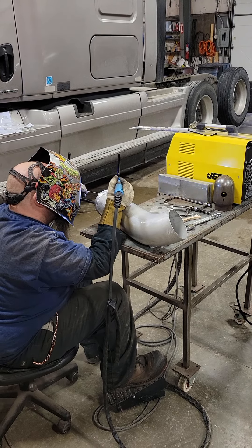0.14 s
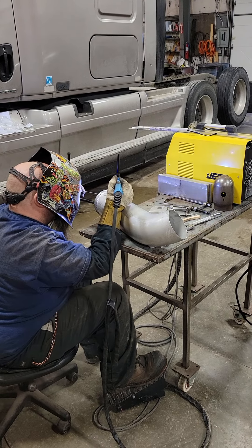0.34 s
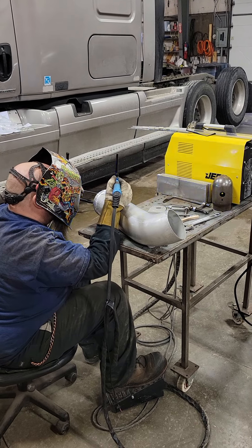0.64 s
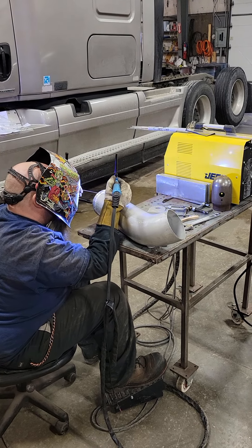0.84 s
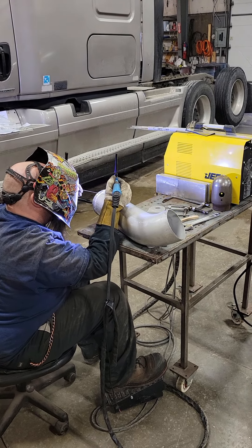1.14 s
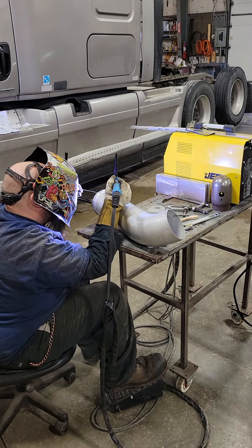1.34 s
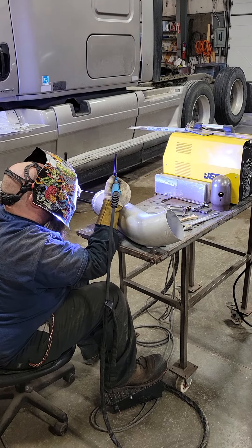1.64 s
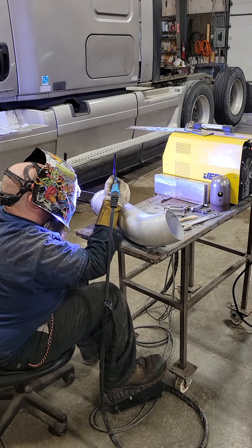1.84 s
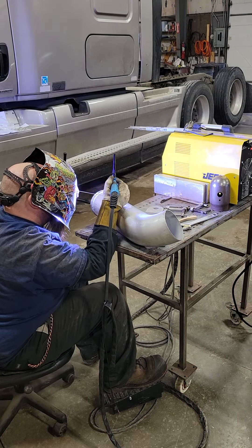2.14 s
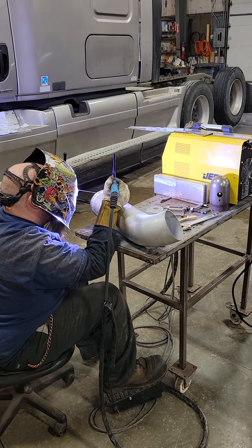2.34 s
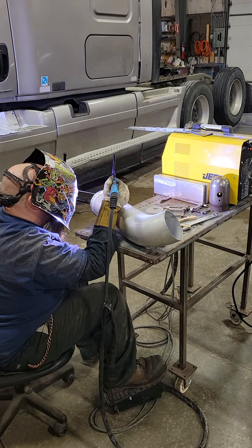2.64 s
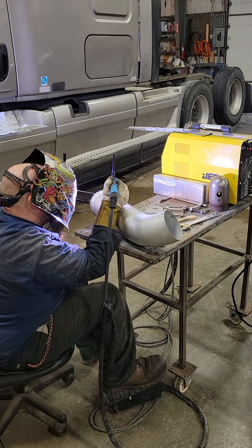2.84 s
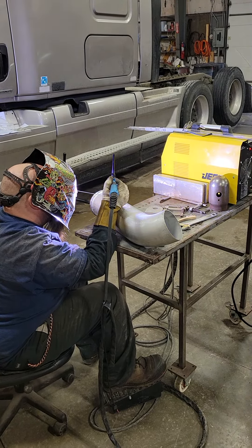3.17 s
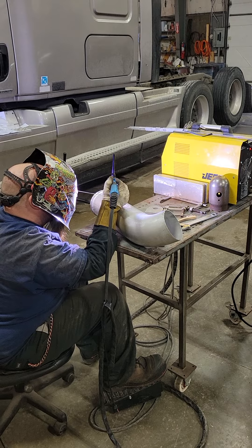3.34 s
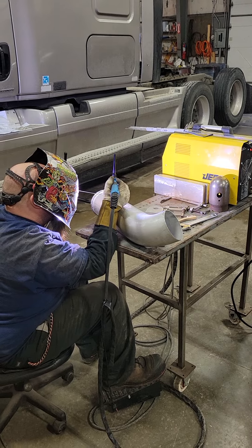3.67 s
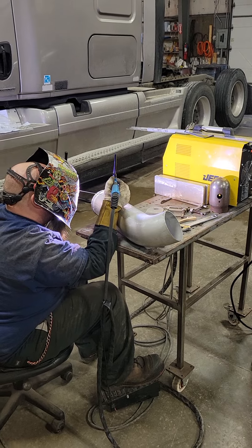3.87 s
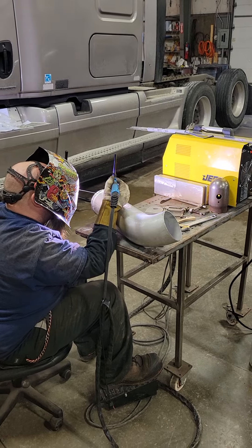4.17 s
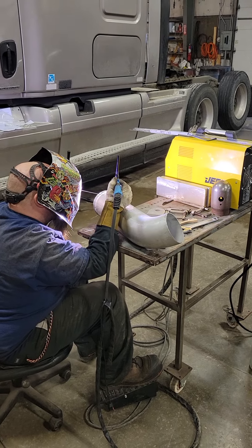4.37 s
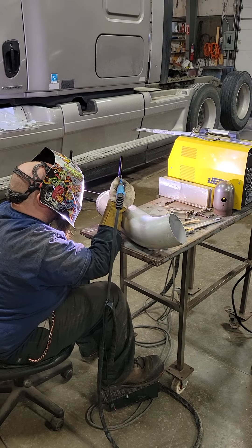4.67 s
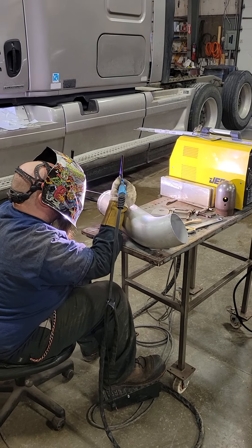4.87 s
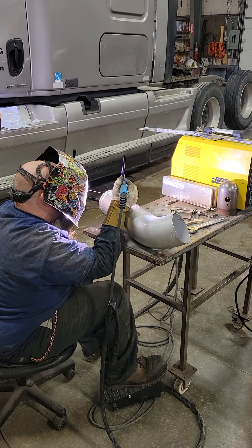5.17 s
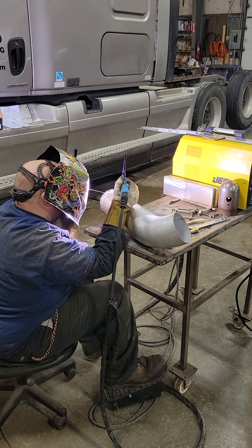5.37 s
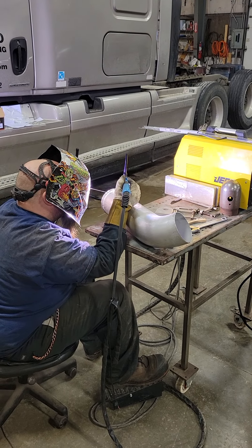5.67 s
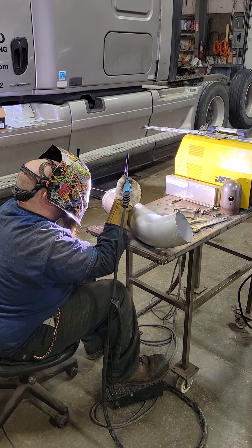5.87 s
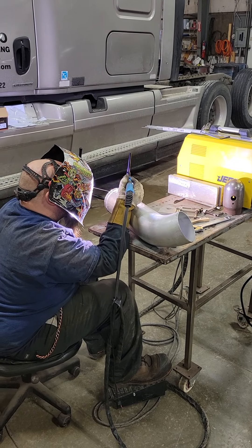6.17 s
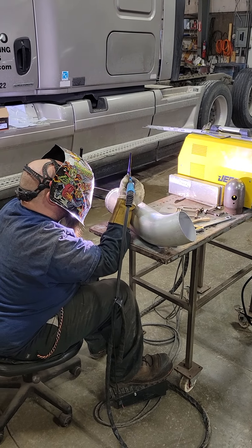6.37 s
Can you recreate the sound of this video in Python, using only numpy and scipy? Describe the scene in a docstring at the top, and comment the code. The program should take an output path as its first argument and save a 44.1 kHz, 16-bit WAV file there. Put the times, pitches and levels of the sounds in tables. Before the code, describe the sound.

Rough, popping arc start on aluminum tube smooths into a bright, raspy, continuous welding buzz, with gas hiss and faint machine hum behind.

```python
"""An alternating-current welding arc on aluminium tube snaps at each reversal of its current, in a large workshop.
Snaps are clicks with spits of noise; bench and tube return them as short echoes and the hall smears them.
At first the arc sputters with pops and rasps on every second cycle, then settles into an even buzz.
Low tones ring on and hiss surrounds the arc; mains hum, a whine, a fan's rush and two dull knocks lie behind."""
import sys
import numpy as np
from scipy import signal
from scipy.fft import rfft, irfft, next_fast_len
from scipy.io import wavfile
from scipy.ndimage import map_coordinates

SR = 44100
rng = np.random.default_rng(int(sys.argv[2]) if len(sys.argv) > 2 else 0)


def materialize(psi):
    """Save the field psi as 16-bit PCM at rate SR to the path in sys.argv[1].

    A 1-D psi becomes a single channel; in a 2-D psi each row is a channel.
    """
    bounded = np.clip(np.atleast_2d(psi).T, -1, 1)
    quanta = np.round(bounded * 32767).astype(np.int16)
    wavfile.write(sys.argv[1], SR, quanta)


N = 287091
T = np.arange(N) / SR
SIZE = next_fast_len(N + SR)
HZ = np.maximum(np.arange(SIZE // 2 + 1) * SR / SIZE, 1)
CYCLE_HZ = 66.478   # of the welding current
PRESENCE_HZ, TREBLE_HZ = 5425, 9180   # lower edges of the two upper bands
SPUTTER_END_S = 1.0   # end of the crackles and of the sputter's hiss level


def from_db(db):
    """Decibels to gain."""
    return 10 ** (np.asarray(db) / 20)


def rms_one(x):
    """Scaled to unit rms."""
    return x / np.sqrt(np.mean(x ** 2) + 1e-20)


def read(rows, at):
    """Every column of a table, interpolated along its first one."""
    first, *columns = np.transpose(rows)
    return np.array([np.interp(at, first, column) for column in columns])


def at_hz(rows):
    """Table columns over the whole frequency grid, straight on a log axis."""
    return read([(np.log(row[0]), *row[1:]) for row in rows], np.log(HZ))


def above(edge_hz, power):
    """Smooth response that passes what lies above an edge."""
    return 1 / (1 + (edge_hz / HZ) ** power)


def below(edge_hz, power):
    """Smooth response that passes what lies below an edge."""
    return 1 / (1 + (HZ / edge_hz) ** power)


def late(ms):
    """Response of a delay: phase falls in proportion to frequency."""
    return np.exp(-2j * np.pi * HZ * ms / 1000)


def shaped(x, response):
    """Filtered by a frequency response."""
    return irfft(rfft(x, SIZE) * response, SIZE)[..., :N]


def coloured(x, spectrum):
    """Filtered so that a unit click comes out with unit peak."""
    gain = from_db(at_hz(spectrum)[0])
    return shaped(x, gain / gain.mean())


def sudden(x, spectrum):
    """Coloured by the causal, minimum-phase filter: nothing rings ahead of a click."""
    gain = from_db(at_hz(spectrum)[0])
    cepstrum = irfft(np.log(gain / gain.mean()), SIZE)
    # fold the cepstrum onto positive time
    cepstrum = cepstrum * (1 + np.sign(SIZE // 2 - np.arange(SIZE)) * (np.arange(SIZE) > 0))
    return shaped(x, np.exp(rfft(cepstrum)))


def clicks(times, sizes):
    """Clicks placed between samples as short windowed sincs."""
    spot = np.asarray(times)[:, None] * SR
    taps = np.floor(spot) + np.arange(-8, 9)
    kernel = np.sinc(taps - spot) * np.cos(np.pi * (taps - spot) / 18) ** 2
    places = np.clip(taps, 0, N - 1).astype(int)
    return np.bincount(places.ravel(), (kernel * sizes[:, None]).ravel(), N)


def dying(times, sizes, decay_ms):
    """Envelope that jumps up at each time and dies exponentially."""
    return signal.lfilter([1], [1, -np.exp(-1000 / (decay_ms * SR))], clicks(times, sizes) + 1e-18)


def bursts(times, sizes, decay_ms):
    """Noise that starts at each time and dies exponentially."""
    return dying(times, sizes, decay_ms) * rng.standard_normal(N)


def to_ports(pair, shared):
    """Two unrelated spectra: the right port gets a share of the left a little late, the rest is its own."""
    left, own = pair
    shared = np.clip(shared, 0, 1)
    return np.array([left, shared * left * late(0.16) + np.sqrt(1 - shared ** 2) * own])


# The arc as its current comes up. Each row: start in seconds, relative snap level in dB, timing unsteadiness
# in ms, relative sizzle level in dB, gain of the bright band in dB, left over right in dB.
ARC = [(0.0, -34.5, 0.006, -32.5, -0.5, -2), (0.87, -32, 0.0077, -43, -15, 0.2),
       (1.01, -35, 0.014, -44.5, -3, 1), (1.35, -34, 0.011, -35, 1.5, -2),
       (1.7, -28, 0.028, -32.5, 0, -1.5), (2.1, -28, 0.023, -33, 0.5, -1.5),
       (2.48, -26.5, 0.0045, -37, 3.5, -0.5), (3.1, -27, 0.0056, -39, 3, -0.5),
       (3.7, -26, 0.0066, -36, 1.5, -1), (4.15, -26.5, 0.0046, -35, -0.5, -1),
       (4.9, -26, 0.004, -38, 0.5, -0.3), (5.6, -26.5, 0.004, -39, 0.5, -0.7),
       (6.51, -26.5, 0.0035, -39.5, 0.3, -0.5)]
# Snaps arriving early or late as the torch moves. Each row: time in seconds, lateness in ms.
ARRIVAL = [(2.4, 0), (2.7, -.04), (3.3, .01), (4.2, .07), (4.8, .035), (5.4, -.02), (6.0, -.04),
           (6.51, -.02)]
# Shortening gap from falling to rising reversal. Each row: time in seconds, gap in ms.
GAP = [(0, 8.38), (.5, 8.27), (1, 7.8), (2.1, 6.7), (2.45, 6.2), (6.51, 6.19)]
# Colour of a snap. Each row: frequency in Hz, relative gain in dB.
SNAP = [(60, -45), (200, -16), (400, -8.5), (900, -18), (1400, -4), (1700, -9), (2000, -1), (2400, -4),
        (2800, 5.5), (3300, 5), (4000, 6), (5500, -2), (6800, -0.5), (8500, -1), (11000, -4.5),
        (13000, -2.5), (16000, -6)]
# Colour of the sizzle. Each row: frequency in Hz, relative gain in dB.
SIZZLE = [(150, -41), (2500, -5.5), (6000, -7), (9000, -1.5), (11500, 3), (13000, -2), (16000, 3)]
# Random spread of the spits. One row each for falling and rising reversal: spread in dB.
SPIT_SPREAD_DB = [
    [1.5],
    [1.1],
]
MIDDLE_MS = 3.7   # middle of the gap, from the start of the cycle
FALLING_DB, FALLING_SIZZLE_DB = -5, 8   # falling reversal against the rising one
FALLING_TREBLE_DB, RISING_TREBLE_DB = -2, -2.5   # treble gain of each snap


def arc():
    """Two opposite snaps a cycle, each with a spit of treble; the creeping bands come apart."""
    cycle = np.arange(int(N / SR * CYCLE_HZ) + 1) / CYCLE_HZ
    snap_db, unsteady_ms, sizzle_db = read(ARC, cycle)[:3]
    chance = rng.standard_normal((6, len(cycle)))
    offset_ms = MIDDLE_MS + read(ARRIVAL, cycle) + read(GAP, cycle) * [[-.5], [.5]]
    falling, rising = cycle + (offset_ms + np.abs(unsteady_ms) * chance[:2]) / 1000
    spread_db = .5 + 70 * np.abs(unsteady_ms)   # an unsteady arc also wavers in strength
    treble = above(TREBLE_HZ, 8)
    falling_snaps = clicks(falling, -from_db(snap_db + FALLING_DB + spread_db * chance[2]))
    rising_snaps = clicks(rising, from_db(snap_db + spread_db * chance[3]))
    snaps = shaped(falling_snaps, from_db(FALLING_TREBLE_DB * treble))
    snaps = snaps + shaped(rising_snaps, from_db(RISING_TREBLE_DB * treble))
    sizes = from_db(sizzle_db + [[FALLING_SIZZLE_DB], [0]] + SPIT_SPREAD_DB * chance[4:])
    spray = spits(falling, sizes[0]) + spits(rising, sizes[1])
    buzz = from_db(21.5) * coloured(snaps, SNAP) + from_db(11.0) * coloured(spray, SIZZLE)
    return buzz, glide(falling, snap_db)


SPIT_MEMORY, SPIT_MS = 0.96, 0.8   # share of its shape a spit hands to the next cycle, and its decay in ms


def spits(times, sizes):
    """Short bursts of noise, each shaped much like the one a cycle before."""
    fresh = rng.standard_normal((len(times) + 100, 256))
    shapes = signal.lfilter([np.sqrt(1 - SPIT_MEMORY ** 2)], [1, -SPIT_MEMORY], fresh, axis=0)[100:]
    shapes = signal.resample(shapes, 2048, axis=1)   # eight points a sample, to read between samples
    last = np.maximum(np.searchsorted(times, T) - 1, 0)
    since = T - times[last]
    envelope = (since >= 0) * sizes[last] * np.exp(-1000 * np.abs(since) / SPIT_MS)
    return envelope * shapes[last, np.clip(since * SR * 8, 0, 2047).astype(int)]


# Bands in the sizzle that fade in, creep in pitch and fade out as the torch moves. Each row: start in seconds,
# end in seconds, start frequency in Hz, end frequency in Hz, relative level in dB.
GLIDE = [(1.1, 1.6, 13300, 7200, -13), (2.7, 5.2, 8700, 17000, -7), (4.4, 6.9, 12950, 17000, -17),
         (4.7, 6.7, 12300, 12550, -0.5), (0.89, 6.3, 13000, 12000, -4)]


def glide(times, snap_db):
    """Every falling reversal rings briefly in the creeping bands."""
    bands = 0
    since = T - times[np.maximum(np.searchsorted(times, T) - 1, 0)]
    for start, end, start_hz, end_hz, level_db in GLIDE:
        way = np.clip((T - start) / (end - start), 0, 1)
        hz = start_hz + (end_hz - start_hz) * way
        bands = bands + from_db(level_db) * np.sin(np.pi * way) * np.sin(2 * np.pi * hz * since)
    return dying(times, from_db(snap_db), decay_ms=1.8) * bands


# Colour of a suction pop. Each row: frequency in Hz, relative gain in dB.
POP = [(30, -60), (100, -22), (250, -2.5), (500, 0), (800, 0), (1100, 1.5), (1500, 0.5), (1800, 3),
       (2100, 3), (3000, -4), (4500, -3.5), (7000, -9), (12000, -5), (16000, -19.5)]
RASP_DB, CRACK_DB = -21, -14   # rasp and sharp treble edge, against the strike's level


def sputter():
    """The arc fails to relight, then breaks through: a suction pop, a short rasp, a crack, a treble spray."""
    s, peak_db, spray_db = pop_train()
    pops = clicks(s, -from_db(peak_db)) + bursts(s, from_db(peak_db + RASP_DB), decay_ms=2.25)
    cracks = clicks(s, -from_db(peak_db + CRACK_DB))
    spray = bursts(s, from_db(peak_db + spray_db), decay_ms=1.47)
    return sudden(pops, POP) + coloured(cracks + spray, SIZZLE)


# Strikes of the sputtering arc, one to four every second cycle, then a few strays. Each row: time in seconds,
# relative level in dB, treble spray against that level in dB.
STRIKES = [(0.0115, -5, -8), (0.0188, -4.5, -14), (0.042, -2.5, -17), (0.0721, -1.5, -19),
           (0.0744, -6, -11), (0.0773, -8, -13), (0.1011, -2, -12), (0.1045, -8, -17), (0.132, -0.5, -14),
           (0.139, -6, -12), (0.1626, -1, -14), (0.1694, -6, -11), (0.1928, -3.5, -14), (0.2226, -3, -9),
           (0.2288, -4, -16), (0.2516, -5.5, -14.1), (0.2556, -4.5, -15.9), (0.2817, -3, -10),
           (0.3129, -3, -10), (0.315, -3.5, -13.0), (0.3194, -13, -15.4), (0.3224, -10, -7),
           (0.3411, -2, -10), (0.372, -1.5, -12), (0.3768, -5, -14), (0.4025, -4.5, -16), (0.4052, -9, -8),
           (0.4093, -6.5, -12), (0.4323, -4.5, -5), (0.4637, -4.5, -12), (0.466, -8.5, -7),
           (0.492, -3.5, -11), (0.4958, -11, -13), (0.4992, -7, -7), (0.511, -12, -16), (0.54, -5.5, -3.5),
           (0.5431, -13, -4), (0.5665, -3.5, -10), (0.598, -5, -6), (0.6277, -4, -8), (0.6581, -6.6, -16),
           (0.6612, -10, -4), (0.6628, -8, -14.8), (0.69, -3, -13), (0.6915, -5, -11), (0.6956, -5, -25),
           (0.7181, -1.2, -17), (0.7217, -16, -15.9), (0.7234, -9, -15.2), (0.7491, -1, -13),
           (0.7777, -2, -12), (0.782, -7, -17), (0.7842, -9, -17), (0.808, -8, -8), (0.8116, -1.5, -23),
           (0.816, -12, -19), (0.8395, 0, -23), (0.8437, -5, -14), (0.867, -1.5, -16), (0.8733, -7, -20),
           (0.8798, -1.5, -19), (0.887, -7, -20), (0.9057, -4, -10), (0.9129, -4.5, -7), (0.937, -4, -10),
           (0.944, -1.7, -22), (0.966, -3, -14.3), (0.9739, -3, -10), (0.9959, -6, -6), (1.0027, -3, -18),
           (1.1039, -3.5, -18), (1.1065, -18, -11), (1.2081, -1.5, -14), (1.2108, -17, -10),
           (3.6104, -16, -20)]
AFTER_FROM_MS, AFTER_TO_MS = 3, 12   # a strike leaves one weak crackle somewhere in this span
AFTER_DB, AFTER_SPREAD_DB = -14, 2.5   # crackle against its strike, and its random spread
AFTER_SPRAY_DB = -21   # treble spray against the crackle


def pop_train():
    """Times, levels and spray levels of the strikes and of the crackles they leave while the sputter lasts."""
    s, peak_db, spray_db = np.transpose(STRIKES)
    after = s + rng.uniform(AFTER_FROM_MS, AFTER_TO_MS, len(s)) / 1000
    crackle_db = peak_db + AFTER_DB + AFTER_SPREAD_DB * rng.standard_normal(len(s))
    heard = s < SPUTTER_END_S
    crackle_spray_db = np.full(heard.sum(), AFTER_SPRAY_DB)
    return np.r_[s, after[heard]], np.r_[peak_db, crackle_db[heard]], np.r_[spray_db, crackle_spray_db]


# Paths from the arc to each microphone port. Each row: delay in ms, then the signed gains (linear) of the body,
# of the presence band and of the treble.
LEFT_PATHS = [(0.0, -0.28, -0.17, -0.23), (0.092, 0.83, -0.031, 0.47), (0.384, -0.49, 0.42, 0.45),
              (0.588, -0.24, 0.65, -0.49), (0.912, 0.35, -0.0023, -0.23), (1.232, -0.27, 0.15, 0.13),
              (2.0, -0.24, 0.28, -0.18), (2.184, -0.3, -0.032, -0.096), (2.452, -0.59, 1.11, 0.098),
              (2.544, -0.0056, -0.27, -0.55), (2.64, -0.57, 0.44, 0.27), (2.812, -0.17, -0.54, 0.53),
              (3.056, -0.31, 0.3, 0.0062), (3.452, -0.26, -0.028, -0.22), (3.512, -0.56, 0.057, -0.19),
              (3.704, -0.023, -0.13, 0.42), (4.232, 0.21, 0.47, -0.099), (4.62, 0.27, -0.17, 0.36),
              (6.236, -0.36, -0.1, -0.1), (6.6, -0.016, -0.32, -0.15), (7.208, -0.19, -0.0068, 0.16),
              (8.576, 0.33, 0.11, 0.17)]
RIGHT_PATHS = [(0.116, -0.16, 0.27, -0.12), (0.54, -0.28, -0.14, -0.24), (0.808, 0.21, 0.34, 0.076),
               (1.528, 0.052, 0.085, 0.062), (2.244, 0.2, 0.072, -0.063), (2.472, 0.29, 0.035, 0.039),
               (2.84, -0.0025, 0.28, -0.11), (3.5, 0.49, 0.081, 0.051), (3.56, 0.15, 0.59, -0.027),
               (3.86, -0.054, -0.28, 0.23), (3.956, -0.0038, -0.3, 0.12), (4.516, 0.15, -0.26, 0.033),
               (5.972, -0.0017, 0.069, -0.029), (6.44, -0.11, 0.12, -0.11), (6.88, -0.17, 0.075, -0.064),
               (7.136, -0.12, -0.24, -0.027), (7.22, -0.0099, -0.5, 0.022), (8.636, -0.14, 0.2, 0.06)]
LONG_WAVE_HZ, LONG_WAVE_GAIN = 340, 0.89   # waves below this bend round bench and tube to both ports alike


def near_paths(x):
    """Direct sound and the echoes off bench and tube, each with its own share of three bands."""
    upper, top = above(PRESENCE_HZ, 8), above(TREBLE_HZ, 8)
    sides = []
    for paths in (LEFT_PATHS, RIGHT_PATHS):
        sides.append(sum((body * (1 - upper) + presence * (upper - top) + treble * top) * late(ms)
                         for ms, body, presence, treble in paths))
    low = below(LONG_WAVE_HZ, 4)
    return shaped(x, (1 - low) * np.array(sides) + LONG_WAVE_GAIN * low)


# Shift of the right port's lag as the torch moves along the seam. Each row: time in seconds, lateness in ms.
RIGHT_SHIFT = [(0, -0.0069), (3.3, -0.0096), (4.2, 0.0058), (5.2, 0.0084), (6.51, 0.015)]


def moving(pair):
    """The right port read a shade early or late."""
    n = np.arange(N)
    shift = read(RIGHT_SHIFT, n / SR)[0] * SR / 1000   # samples
    return np.array([pair[0], map_coordinates(pair[1], [n - shift], order=5)])


FACING_LOW_HZ, FACING_HIGH_HZ = 2070, 2760   # here the right port hears what the left does, a little late
FACING_LAG_MS, FACING_GAIN = 0.1903, 0.88


def facing(pair):
    """In the facing band the right spectrum gives way to the delayed left one, so their sum is hollow there."""
    left, right = pair
    band = above(FACING_LOW_HZ, 16) * below(FACING_HIGH_HZ, 16)
    return np.array([left, (1 - band) * right + band * FACING_GAIN * left * late(FACING_LAG_MS)])


# Low orders of the current cycle that ring on in tube and bench. Each row: multiple of the cycle,
# left and right level in dB against the snap setting.
DRONE = [(6, -29, -28.5), (11, -26.5, -33), (12, -33, -34), (13, -54, -57), (14, -34, -23), (15, -38, -36),
         (16, -36, -37), (17, -47, -47), (18, -46, -30.5), (19, -39, -33), (21, -25.5, -42), (23, -37, -59)]


def drone():
    """Steady low tones at multiples of the current cycle that follow the level of the snaps."""
    tones = 0
    for k, left, right in DRONE:
        tone = np.sin(2 * np.pi * (round(k) * CYCLE_HZ * T + rng.random()))
        tones = tones + from_db([[left], [right]]) * tone
    return np.sqrt(2) * from_db(read(ARC, T)[0]) * tones


# Colour of the hiss. Each row: frequency in Hz, relative gain in dB.
HISS = [(300, -44), (600, -27), (1000, -8), (1800, 4.5), (2500, 9), (3000, 16), (6500, 1.5), (10000, 6),
        (16000, -36)]
HISS_DB, SPUTTER_HISS_DB = -38.5, -35.5   # hiss of the settled arc, and while it sputters
HISS_SHARED = 0.63   # share of the hiss common to both ports


def hiss():
    """Plasma and shielding gas hiss, coloured noise spread wide by the shop."""
    noise = to_ports(rfft(rng.standard_normal((2, SIZE))), HISS_SHARED) * from_db(at_hz(HISS))
    level_db = np.where(T < SPUTTER_END_S, SPUTTER_HISS_DB, HISS_DB)
    return rms_one(irfft(noise, SIZE)[:, :N]) * from_db(level_db)


HALL_T60_S, HALL_DB, HALL_CUT_HZ, HALL_GAP_S = 0.7, -6.5, 7200, 0.006
HALL_SHARED = 0.96   # share of the tail common to both ports


def hall(x):
    """A dense tail of dying noise, dull in the treble."""
    t = np.arange(SR) / SR
    tail = rng.standard_normal((2, len(t))) * from_db(-60 * t / HALL_T60_S) * (t > HALL_GAP_S)
    tail = rfft(rms_one(tail) / np.sqrt(len(t)), SIZE) / np.sqrt(1 + (HZ / HALL_CUT_HZ) ** 2)
    return from_db(HALL_DB) * shaped(x, to_ports(tail, HALL_SHARED))


# Modes that a knock rings with. Each row: frequency in Hz, relative level in dB, 60 dB decay in seconds.
KNOCK = [(270, -23, 0.03), (394, -13.5, 0.02), (920, -29, 0.012), (1400, -14, 0.012), (2040, -4.5, 0.0039),
         (2760, -5.5, 0.0041), (12500, -23, 0.004)]
# Dull knocks off to the right. Each row: time in seconds, relative level in dB.
KNOCKS = [(4.0628, -12.5), (5.1155, -21.5)]
KNOCK_LEAD_MS = 0.16   # lead of the right port


def knock():
    """A few short modes, struck at each knock, with opposite sign in the two ports."""
    out = 0
    for s, peak_db in KNOCKS:
        t = np.maximum(T - s + np.array([[0], [KNOCK_LEAD_MS / 1000]]), 0)
        for hz, level_db, t60 in KNOCK:
            out = out + from_db(peak_db + level_db - 60 * t / t60) * np.sin(2 * np.pi * hz * t)
    return out * [[1], [-1]]


# Mains hum. Each row: multiple of the hum pitch, left and right rms level in dB before the ports' colour.
HUM = [(1, -51.5, -49), (2, -58, -59), (4, -45, -51), (5, -81, -88), (6, -51.5, -57.5), (8, -89, -60.5),
       (9, -71, -86)]
# Switching tone of the power supply. One row each for left and right: rms level in dB before the ports' colour.
WHINE_DB = [
    [-64],
    [-70],
]
# Colour of the fan. Each row: frequency in Hz, relative gain in dB.
FAN = [(20, -42), (35, -8), (52, -1.5), (62, -1), (77, 6), (98, -6), (160, -2), (200, -6), (270, 3.5),
       (400, -8), (600, -5.5), (800, -5), (1500, -13), (3000, -25)]
# Likeness of the fan in both ports. Each row: frequency in Hz, left-right correlation (1 is identical).
LIKENESS = [(60, .985), (180, .96), (400, .75), (900, .6), (2400, .3)]
HUM_HZ, WHINE_HZ, FAN_DB = 119.9, 15314.3, -45.5


def power_supply():
    """Mains hum with its overtones, a thin whine and the cooling fan's rush of coloured noise."""
    hum = 0
    for k, left, right in HUM:
        hum = hum + from_db([[left], [right]]) * np.sin(2 * np.pi * (k * HUM_HZ * T + rng.random()))
    whine = from_db(WHINE_DB) * np.sin(2 * np.pi * WHINE_HZ * T)
    alike = np.clip(at_hz(LIKENESS)[0], -1, 1)
    mid, side = rfft(rng.standard_normal((2, SIZE)))
    rush = np.sqrt(1 + alike) * mid + np.sqrt(1 - alike) * side * [[1], [-1]]
    rush = irfft(from_db(at_hz(FAN)[0]) * rush, SIZE)[:, :N]
    return np.sqrt(2) * (hum + whine) + from_db(FAN_DB) * rms_one(rush)


# Direct share of the creeping bands. One row each for left and right port: gain in dB.
GLIDE_DB = [
    [-2],
    [-11.5],
]
BRIGHT_HZ, BRIGHT_OCTAVES = 6000, 0.45   # centre and half width of the bright band
SPUTTER_HALL_DB = -1.5   # the sputter's share of the hall against the arc's


def scene():
    """Arc and sputter through their echoes and the hall, drone and hiss around them, the machine beside them."""
    bright_db, pan_db = read(ARC, T)[3:]
    buzz, bands = arc()
    pops = sputter()
    bright = shaped(buzz, np.exp(-.5 * (np.log2(HZ / BRIGHT_HZ) / BRIGHT_OCTAVES) ** 2))
    buzz = buzz + (from_db(bright_db) - 1) * bright
    room = hall(buzz + from_db(SPUTTER_HALL_DB) * pops)
    torch = moving(near_paths(buzz + pops)) + room + from_db(GLIDE_DB) * bands
    torch = from_db(pan_db * [[.5], [-.5]]) * torch
    torch = irfft(facing(rfft(torch + hiss(), SIZE)), SIZE)[:, :N]
    return torch + drone() + power_supply() + knock()


# Colour of the microphone ports. Each row: frequency in Hz, left and right gain in dB.
PORTS = [(98, 2, 1), (179, 1, -0.5), (406, -6.5, 5), (967, 0.5, -5.5), (1480, 2.5, 10), (3000, 2, 0),
         (6600, 4.5, 8.5), (8640, -2.5, -11), (10810, -1.5, -7), (12000, 4.5, 10), (15900, 4, 10.5)]
# Phase by which the right port trails the left. Each row: frequency in Hz, phase in radians.
PORT_PHASE = [(200, 0), (340, .6), (550, 3.1), (1000, 6.28)]
CUTOFF_HZ = 16100


def record(dry):
    """Each port has its own colour, the right turns a full cycle in phase through the low mids; the top is cut."""
    ports = from_db(at_hz(PORTS)) * np.exp(-1j * at_hz(PORT_PHASE) * [[0], [1]])
    steep_cut = signal.cheby2(22, 70, CUTOFF_HZ, fs=SR, output="sos")
    return signal.sosfilt(steep_cut, shaped(dry, ports))


dry = scene()
out = record(dry)
materialize(out)
```